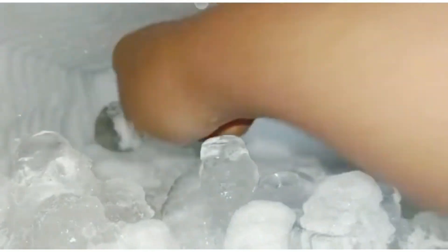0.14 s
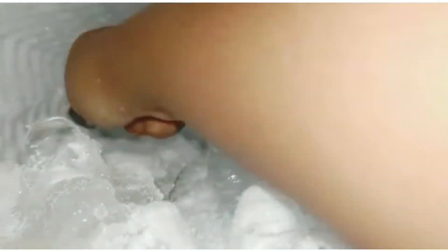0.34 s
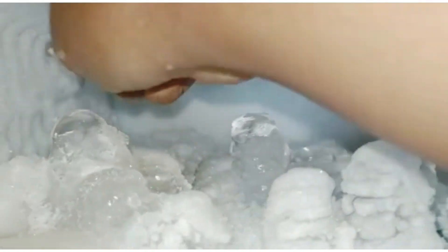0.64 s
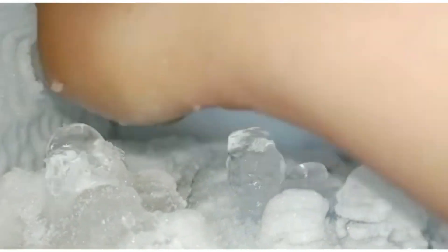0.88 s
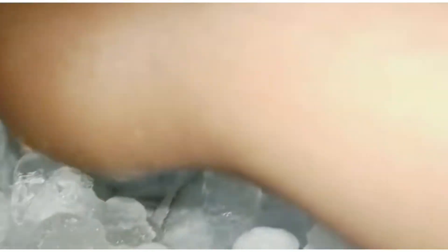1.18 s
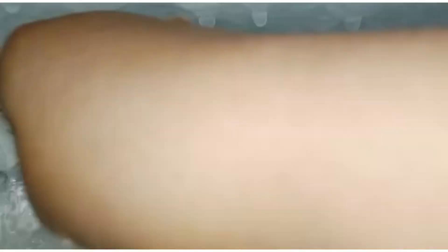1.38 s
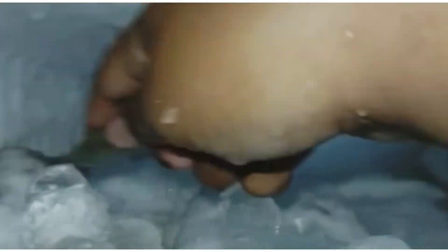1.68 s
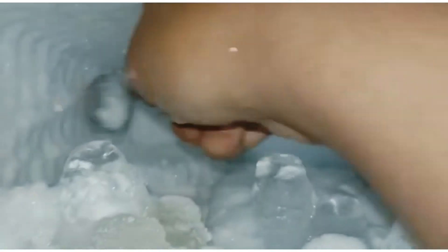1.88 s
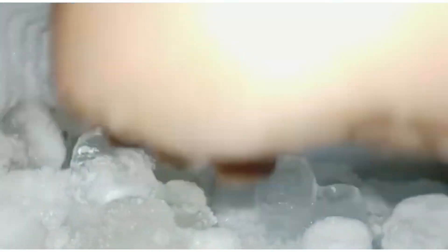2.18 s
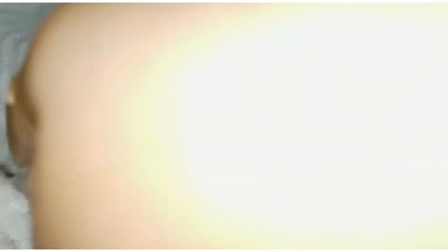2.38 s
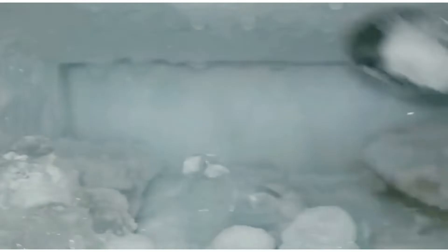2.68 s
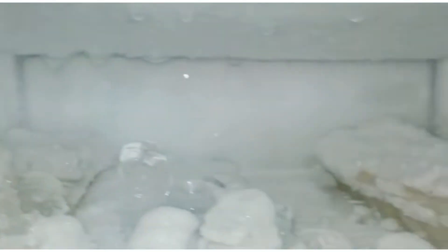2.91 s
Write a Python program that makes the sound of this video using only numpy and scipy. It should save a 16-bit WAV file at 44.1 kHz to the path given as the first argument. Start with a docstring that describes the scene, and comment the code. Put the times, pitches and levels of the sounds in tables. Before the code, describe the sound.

A metal blade scrapes thick frost, close up in a small freezer. After two dull bumps, crunchy scraping runs from 0.4 to 1 second, with snapping chips and hollow wall thuds. A second bout follows from 1.2 to 1.5 seconds with tiny squeals, and a third from 2 to 2.5. Then a lump knocks, a hand briefly rubs the wall, and ice clinks lightly as frost patters down around 2.9 seconds.

```python
"""Dull bumps on a hollow wall, then a metal blade scraping thick frost in a small freezer: three bouts.
The frost breaks in a stream of tiny fractures that ring the blade and shake the wall.
Chips snap off, the blade squeals on hard ice, lumps knock and clink, loosened frost patters down.
Underneath: shifting ice, a hand rubbing the wall, a low noise."""
import sys
import numpy as np
from scipy import signal
from scipy.fft import rfft, irfft
from scipy.io import wavfile

SR = 44100
rng = np.random.default_rng(int(sys.argv[2]) if len(sys.argv) > 2 else 0)


def dump(signal):
    """Clip the signal to [-1, 1] and save it as 16-bit WAV at the path in sys.argv[1]."""
    limited = np.clip(np.atleast_2d(signal).T, -1, 1)
    pcm = np.round(limited * 32767).astype(np.int16)
    wavfile.write(sys.argv[1], SR, pcm)


N = 134505
TIME = np.arange(N) / SR
RESPONSE_T, STROKE_T = np.arange(SR // 3) / SR, np.arange(SR // 2) / SR

# light drags and hard bites of the blade: (time [s], length [s], hiss [dB], crunch [dB], rumble [dB])
BLADE_PUSHES = [(0.396, 0.015, -31.5, -13.5, -23), (0.44, 0.042, -26.5, -17.5, -24),
                (0.485, 0.26, -22.5, -23, -21.5), (0.51, 0.033, -21.5, -18.5, -19),
                (0.575, 0.03, -11.5, -13.5, -16), (0.627, 0.04, -12.5, -23, -15.5),
                (0.682, 0.036, -10.5, -11, -9.5), (0.77, 0.059, -11.5, -13.5, -13),
                (0.976, 0.015, -2.5, -3.5, -5.5), (1.24, 0.026, -12.5, -6.5, -9),
                (1.27, 0.015, -10.5, -18, -19), (1.299, 0.016, -14, -13, -10),
                (1.331, 0.01, -4, -4.5, -6.5), (1.35, 0.072, -20, -19, -12.5),
                (1.473, 0.011, -8.5, -8.5, -13.5), (1.532, 0.014, -4.5, -6, -14),
                (1.981, 0.02, -24, -15.5, -19.5), (2.018, 0.091, -17.5, -18, -21.5),
                (2.114, 0.064, -15, -17, -11.5), (2.192, 0.011, -4, -8, -10.5),
                (2.218, 0.041, -11.5, -10.5, -14.5), (2.271, 0.025, -12, -12.5, -17),
                (2.337, 0.038, -15.5, -19.5, -18), (2.389, 0.014, -8, -16.5, -18),
                (2.407, .095, -18.5, -20.5, -21)]
# frost chips snapping off: (time [s], level [dB])
CHIP_SNAPS = [(0.7387, -13), (0.8566, -7.5), (0.8891, -5), (0.9497, -2), (0.9607, 0.5), (1.0311, -9.5),
              (1.2294, 1), (1.421, -4), (1.7383, -15), (1.7653, -17.5), (2.629, -13.5), (2.7076, -18),
              (2.7314, -15)]
# blade squeals: (time [s], length [s], level [dB])
BLADE_SQUEALS = [(1.231, 0.048, -19), (1.301, 0.011, -11.5), (1.333, 0.025, -15.5)]
# blade resonances, high, low and squealing: (frequency [Hz], width [Hz], level [dB], left - right [dB])
BLADE_HISS_MODES = [(4470, 190, -8.5, 22.4), (5750, 320, -5, 13), (6830, 780, 1.5, 1.4),
                    (9040, 400, -13.5, 30), (11220, 250, -8, 3), (11360, 1440, -0.5, 8.1),
                    (12560, 1200, -7, 18), (15000, 1400, -19.5, 5.4)]
BLADE_CRUNCH_MODES = [(636, 80, -1, -10.5), (940, 150, 3, 4.5), (1431, 256, -1.5, 1), (1904, 290, -5, -1),
                      (2378, 64, 2, -5), (2910, 84, -6.5, 10.5)]
BLADE_SQUEAL_MODES = [(5740, 160, -4, 14.5), (2400, 140, -1.5, -4)]
# blade or hand hitting the wall: (time [s], level [dB], most driven pitch [Hz])
WALL_BUMPS = [(0.141, -3, 136), (0.193, -9.5, 292), (0.721, -5, 125), (0.788, 0, 197), (0.827, -5, 190),
              (0.86, -1.5, 218), (0.955, -1.5, 201), (1.015, -2.5, 114), (1.292, 2.5, 217), (1.388, 0, 183),
              (1.483, -0.5, 215), (1.543, 1, 222), (1.864, -9, 324), (1.921, -6.5, 120), (2.146, -2, 232),
              (2.188, 3, 238)]
# hollow wall: (frequency [Hz], level [dB], t60 [s])
HOLLOW_WALL_MODES = [(99.4, -3.5, 0.27), (122.4, -3.5, 0.2), (158.4, -2.5, 0.18), (201.4, 1, 0.13),
                     (229.8, 0, 0.14), (308, -7.5, 0.13), (396.4, -4.5, 0.11), (516, -1.5, 0.049)]
# band the wall radiates: (low edge [Hz], high edge [Hz])
WALL_EDGES_HZ = [69, 710]
# hard ice cracking over a lump: (time [s], crunch [dB], knock [dB])
ICE_CRACKS = [(0.543, -6.5, -8.5), (0.597, -9, -10), (0.654, -7, -10), (0.713, -1, -4), (1.255, -2, -7.5),
              (1.282, -2, -14), (1.368, -15, -6.5), (1.384, -16, -7.5), (2.094, -4.5, -7), (2.141, -3, -5),
              (2.185, -2.5, -13.5), (2.5385, -11, 1)]
# big ice lump: (frequency [Hz], level [dB], t60 [s])
LUMP_MODES = [(209, -8, 0.085), (416, -1, 0.038), (537, -6, 0.028), (830, -2, 0.023), (990, -5, 0.063),
              (1560, -21, 0.022)]
# small loose lumps: (time [s], level [dB], pitch [Hz])
LUMP_CLINKS = [(1.8183, -15.5, 2490), (2.8654, -14.5, 2310), (2.8989, -13.5, 2400)]
# falling frost: (time [s], length [s], level [dB])
CRUMB_SHOWERS = [(2.628, 0.043, -25.5), (2.738, 0.033, -29), (2.899, 0.44, -26.5)]
# shifting ice: (time [s], level [dB])
RUSTLE_CURVE = [(0, -35), (.14, -41), (.21, -33.5), (.37, -34.5), (1.2, -39.5), (1.62, -34), (1.71, -39.5),
                (1.85, -32), (1.96, -37.5), (2.84, -36.5), (2.915, -26.5), (3.05, -33.5)]
# its spectrum: (frequency [Hz], density [dB])
RUSTLE_SPECTRUM = [(600, -4), (1500, -11.5), (2500, -3.5), (4200, -14), (7000, -17.5), (15500, -21)]
# hand on the wall: (time [s], level [dB])
RUB_CURVE = [(.15, -36), (.205, -23), (.34, -30.5), (2.5, -43), (2.56, -17.5), (2.68, -48), (2.9, -30),
             (3.05, -40)]
# low background noise: (frequency [Hz], density [dB])
FLOOR_SPECTRUM = [(25, -24), (123, -3.5), (876, -22.5), (2000, -36), (2600, -70)]

FRACTURES_PER_S, CRUNCHES_PER_S, SIZE_SPREAD_DB = 9000, 1800, 5
SLIP_RATE_HZ, SLIP_DEPTH_DB = 94, 3.5
PUSH_ATTACK_S, PUSH_RELEASE_S, PUSH_SAG_DB = 0.0072, 0.0087, 2.5
HISS_DIRECT_DB, CRUNCH_DIRECT_DB = -4, -16   # fracture noise beside the ringing
MODE_SCATTER_DB, DETUNE_OCT = 1.4, 0.047   # the contact point moves
SNAP_RISE_S = 0.0018
CHIP_HISS_DB, CHIP_CRUNCH_DB, CHIP_DECAY_S = -3.5, -6.5, 0.0034
BUMP_GAIN_DB, BUMP_FOCUS_OCT, BUMP_CONTACT_S = -2.5, 0.48, 0.0034
CRACK_HISS_DB, CRACK_DECAY_S = -8.5, 0.0039   # hiss relative to crunch
CLINK_RING_DB, CLINK_T60_S = 5.5, 0.023
CLINK_HISS_DB, CLINK_CRUNCH_DB, CLINK_DECAY_S = 4, -6, 0.0033
CRUMBS_PER_S, CRUMB_CRUNCH_DB = 770, -8
RUSTLE_PAN_DB, RUSTLE_FLICKER_DB, RUSTLE_FLICKER_HZ = 7.5, 0.5, 23
RUB_HZ, RUB_WIDTH_HZ = 327, 163
FLOOR_DB = -29.5
REFLECTION_T60_S, TAIL_T60_S, TAIL_DB, TAIL_CUTOFF_HZ = 0.03, 0.18, -9, 6500
WALL_ECHO_S, WALL_SIDE_DB, WALL_PAN_DB = 0.00744, -13.5, -2.5
CUTOFF_HZ = 15750


def scraping():
    """Each push breaks frost in stick-slip spurts and shakes the wall."""
    out, shaking = np.zeros((2, N)), np.zeros(N)
    slips = flicker(SLIP_DEPTH_DB, SLIP_RATE_HZ)
    for at_s, length_s, hiss_db, crunch_db, rumble_db in BLADE_PUSHES:
        force = push(length_s) * np.resize(slips[int(at_s * SR):], len(STROKE_T))
        add(out, at_s, breaking(force, hiss_db, crunch_db))
        rumble = through(force * fractures(len(force)), unit_energy(struck(HOLLOW_WALL_MODES)))[0]
        add(shaking, at_s, from_db(rumble_db) * rumble)
    return out + wall_stereo(butter(shaking, WALL_EDGES_HZ, "band"))


def push(length_s):
    """Force envelope: bites, sags as the frost gives way, dies out."""
    attack = np.minimum(STROKE_T / PUSH_ATTACK_S, 1)
    sag = from_db(PUSH_SAG_DB * (.5 - np.minimum(STROKE_T / length_s, 1)))
    return attack * sag * np.exp(-np.maximum(STROKE_T - length_s, 0) / PUSH_RELEASE_S)


def snap(decay_s):
    """Envelope of a sudden break."""
    rise = np.minimum(STROKE_T / SNAP_RISE_S, 1)
    return rise * np.exp(-np.maximum(STROKE_T - SNAP_RISE_S, 0) / decay_s)


def fractures(samples, per_s=FRACTURES_PER_S):
    """Stream of tiny breaks of uneven size; rms 1."""
    sizes = from_db(SIZE_SPREAD_DB * np.minimum(rng.exponential(1, samples), 3))
    signs = rng.choice([-1, 1], samples)
    return rms_one(sizes * signs * (rng.random(samples) < per_s / SR))


def breaking(envelope, hiss_db, crunch_db, fine_per_s=FRACTURES_PER_S):
    """Fine fractures ring the blade's high modes, coarse ones its low modes."""
    fine = envelope * fractures(len(envelope), fine_per_s)
    coarse = envelope * fractures(len(envelope), CRUNCHES_PER_S)
    hiss = through(fine, blade(BLADE_HISS_MODES, HISS_DIRECT_DB, edges_hz=3500, kind="high"))
    crunch = through(coarse, blade(BLADE_CRUNCH_MODES, CRUNCH_DIRECT_DB, [400, 4000], "band"))
    return from_db(hiss_db) * hiss + from_db(crunch_db) * crunch


def blade(modes, direct_db, edges_hz, kind):
    """Blade response to a fracture at one spot in the compartment."""
    reflections = compartment()
    ringing = 0
    for hz, width_hz, db, side_db in modes:
        gain = from_db(db + MODE_SCATTER_DB * rng.standard_normal())
        ringing += gain * pan(side_db) * resonance(reflections, hz, width_hz)
    return unit_energy(butter(ringing + from_db(direct_db) * compartment(), edges_hz, kind))


def chips():
    """Frost chips snap off, each a short burst of fractures."""
    out = np.zeros((2, N))
    for at_s, db in CHIP_SNAPS:
        add(out, at_s, breaking(snap(CHIP_DECAY_S), db + CHIP_HISS_DB, db + CHIP_CRUNCH_DB))
    return out


def squeals():
    """Hard ice drives two narrow blade resonances."""
    out = np.zeros((2, N))
    for at_s, length_s, db in BLADE_SQUEALS:
        force = push(length_s)
        for hz, width_hz, mode_db, side_db in BLADE_SQUEAL_MODES:
            ringing = rms_one(resonance(fractures(len(force)), hz, width_hz))
            add(out, at_s, from_db(db + mode_db) * pan(side_db) * force * ringing)
    return out


def bumps():
    """Each bump rings the wall modes, chiefly those near its own pitch."""
    out = np.zeros(N)
    cushion = np.minimum(RESPONSE_T / BUMP_CONTACT_S, 1)   # frost softens the blow
    for at_s, bump_db, centre_hz in WALL_BUMPS:
        thud = cushion * sum(
            from_db(db) * mode(hz, t60_s) / (1 + (np.log2(hz / centre_hz) / BUMP_FOCUS_OCT) ** 4)
            for hz, db, t60_s in HOLLOW_WALL_MODES)
        add(out, at_s, from_db(BUMP_GAIN_DB + bump_db) * thud / np.abs(thud).max())
    return wall_stereo(butter(out, WALL_EDGES_HZ, "band"))


def lumps():
    """Small lumps clink with a short ring; big ones crack under the blade with a hollow knock."""
    out, knocks = np.zeros((2, N)), np.zeros(N)
    for at_s, db, hz in LUMP_CLINKS:
        add(out, at_s, from_db(db + CLINK_RING_DB) * mode(hz, CLINK_T60_S))
        add(out, at_s, breaking(snap(CLINK_DECAY_S), db + CLINK_HISS_DB, db + CLINK_CRUNCH_DB))
    for at_s, crunch_db, knock_db in ICE_CRACKS:
        add(out, at_s, breaking(snap(CRACK_DECAY_S), crunch_db + CRACK_HISS_DB, crunch_db))
        add(knocks, at_s, from_db(knock_db) * struck(LUMP_MODES))
    return out + wall_stereo(knocks)


def crumbs():
    """Loosened frost falls in short showers of grains."""
    out = np.zeros((2, N))
    for at_s, length_s, db in CRUMB_SHOWERS:
        add(out, at_s, breaking(push(length_s), db, db + CRUMB_CRUNCH_DB, fine_per_s=CRUMBS_PER_S))
    return out


def rustle():
    """Shifting ice: faint fractures, separate at each ear."""
    grains = coloured(np.array([fractures(N), fractures(N)]), RUSTLE_SPECTRUM)
    return pan(RUSTLE_PAN_DB) * level(RUSTLE_CURVE) * grains * flicker(RUSTLE_FLICKER_DB, RUSTLE_FLICKER_HZ)


def hand_rub():
    """A hand rubs the wall: a low band of friction noise."""
    friction = resonance(rng.standard_normal(N), RUB_HZ, RUB_WIDTH_HZ)
    return wall_stereo(level(RUB_CURVE) * rms_one(resonance(friction, RUB_HZ, 2 * RUB_WIDTH_HZ)))


def noise_floor():
    """Steady low noise."""
    return wall_stereo(from_db(FLOOR_DB) * coloured(rng.standard_normal(N), FLOOR_SPECTRUM))


def compartment():
    """Dense close reflections and a faint tail, dull because frost absorbs treble; stereo."""
    close, tail = rng.standard_normal((2, 2, len(RESPONSE_T)))
    phase = np.angle(rfft(close * fade(REFLECTION_T60_S / 2)))
    whitened = irfft(np.exp(1j * phase), len(RESPONSE_T))
    dull_tail = butter(unit_energy(tail * fade(TAIL_T60_S)), TAIL_CUTOFF_HZ, "low")
    return unit_energy(whitened * fade(REFLECTION_T60_S)) + from_db(TAIL_DB) * dull_tail


def wall_stereo(x):
    """Lows reach both ears nearly alike; one reflection widens them."""
    reflection = np.interp(TIME - WALL_ECHO_S, TIME, x, left=0)
    return pan(WALL_PAN_DB) * (x + from_db(WALL_SIDE_DB) * reflection * np.array([[1], [-1]]))


def struck(modes):
    """Body struck at a random spot, each mode slightly detuned."""
    return sum((-1) ** k * from_db(db) * mode(hz * 2 ** (DETUNE_OCT * rng.uniform(-1, 1)), t60_s)
               for k, (hz, db, t60_s) in enumerate(modes))


def mode(hz, t60_s):
    """Struck mode, peak 1."""
    return np.cos(2 * np.pi * hz * RESPONSE_T) * fade(t60_s)


def fade(t60_s):
    """Exponential decay."""
    return from_db(-60 * RESPONSE_T / t60_s)


def flicker(depth_db, rate_hz):
    """Bounded random gain; rms 1."""
    wander = rms_one(butter(rng.standard_normal(N), rate_hz, "low"))
    return rms_one(from_db(depth_db * np.clip(wander, -2, 1)))


def coloured(x, spectrum):
    """Shape noise to a spectrum, 12 dB/octave skirts; rms 1."""
    hz, db = np.transpose(spectrum)
    bins_hz = np.maximum(np.fft.rfftfreq(N, 1 / SR), 1)
    gain = from_db(np.interp(np.log(bins_hz), np.log(hz), db))
    skirts = np.minimum(bins_hz / hz[0], 1) ** 2 * np.minimum(hz[-1] / bins_hz, 1) ** 2
    return rms_one(irfft(rfft(x) * gain * skirts, N))


def resonance(x, hz, width_hz):
    """Two-pole resonance, peak gain 1."""
    radius = np.exp(-np.pi * width_hz / SR)
    feedback = [1, -2 * radius * np.cos(2 * np.pi * hz / SR), radius ** 2]
    return signal.lfilter(np.array([1, 0, -1]) * (1 - radius ** 2) / 2, feedback, x + 1e-18)


def butter(x, hz, kind):
    """Second-order Butterworth."""
    return signal.sosfilt(signal.butter(2, hz, kind, fs=SR, output="sos"), x)


def through(x, response):
    """Convolve with a response."""
    return signal.fftconvolve(np.atleast_2d(x), np.atleast_2d(response), axes=1)[:, :N]


def add(out, at_s, sound):
    """Mix in at a time."""
    start = int(at_s * SR)
    out[..., start:start + sound.shape[-1]] += sound[..., :N - start]


def level(curve):
    """Gain from a dB curve; silent outside it."""
    times_s, db = np.transpose(curve)
    return from_db(np.interp(TIME, times_s, db, left=-200, right=-200))


def pan(db):
    """Stereo gains for a left - right difference."""
    return from_db(np.array([[db], [-db]]) / 2)


def unit_energy(response):
    """Scale to unity gain for white noise."""
    return rms_one(response) / np.sqrt(response.shape[-1])


def rms_one(x):
    """Scale to rms 1."""
    return x / np.sqrt(np.mean(x ** 2) + 1e-20)


def from_db(db):
    """Decibels to gain."""
    return 10 ** (np.asarray(db) / 20)


def scene():
    """Everything inside the freezer."""
    return scraping() + chips() + squeals() + bumps() + lumps() + crumbs() + rustle() + hand_rub() + noise_floor()


def record(dry):
    """Soft overload on peaks, then a steep low-pass."""
    rounded = dry / (1 + dry ** 6) ** (1 / 6)
    return signal.sosfilt(signal.ellip(10, .1, 70, CUTOFF_HZ, fs=SR, output="sos"), rounded)


dry = scene()
out = record(dry)
dump(out)
```